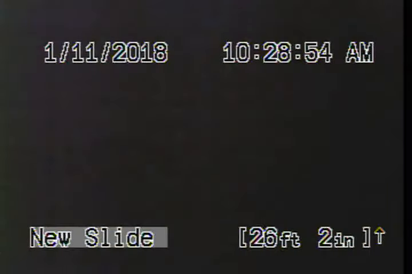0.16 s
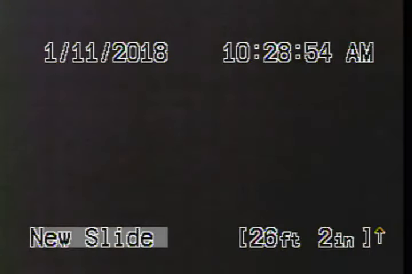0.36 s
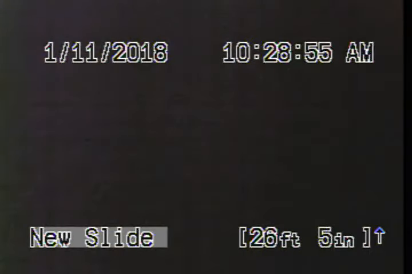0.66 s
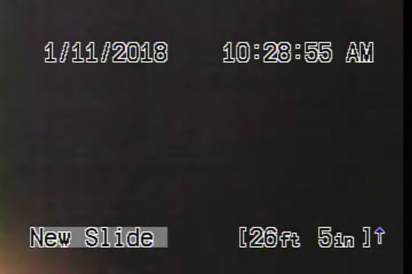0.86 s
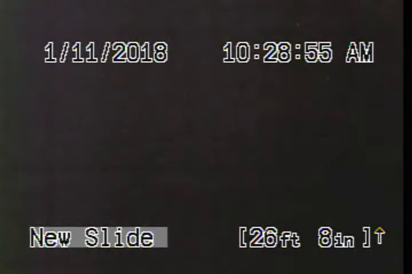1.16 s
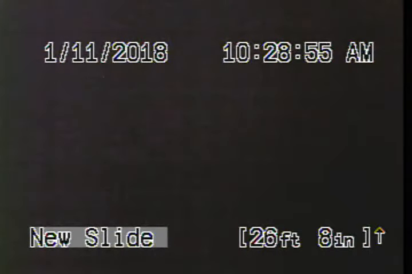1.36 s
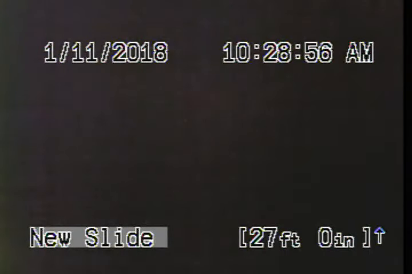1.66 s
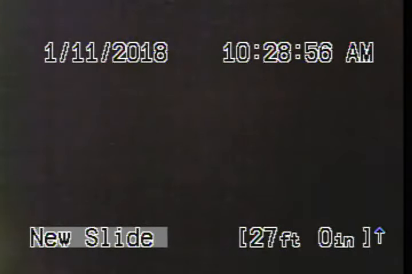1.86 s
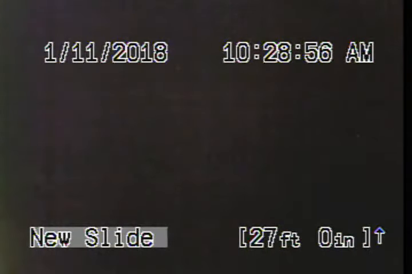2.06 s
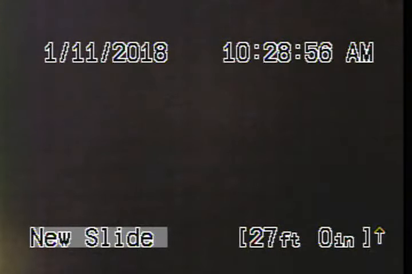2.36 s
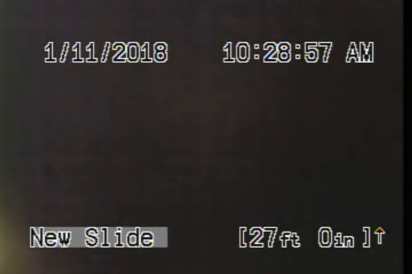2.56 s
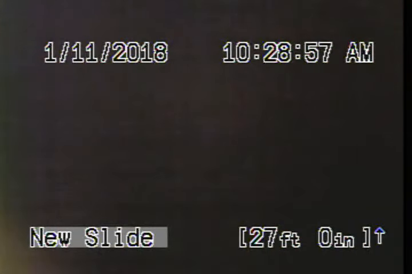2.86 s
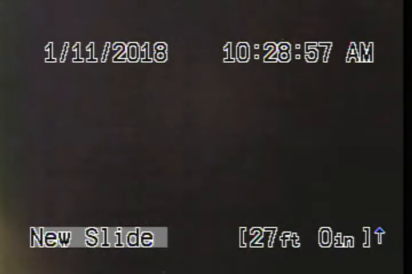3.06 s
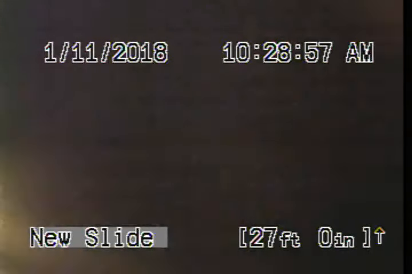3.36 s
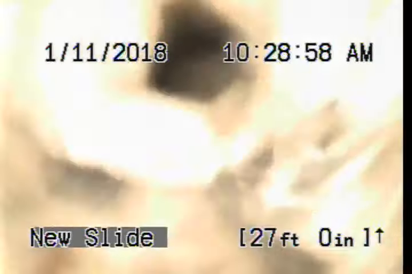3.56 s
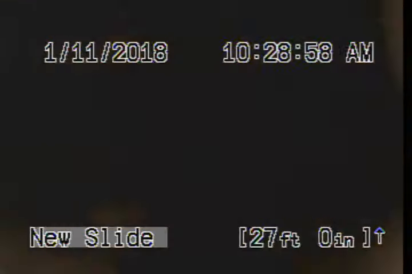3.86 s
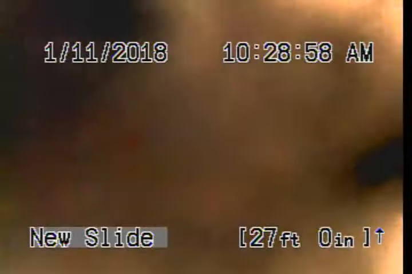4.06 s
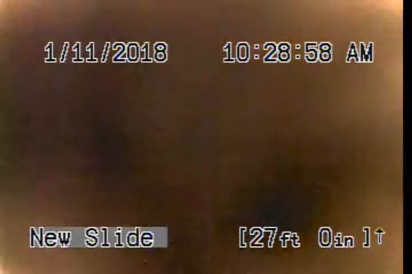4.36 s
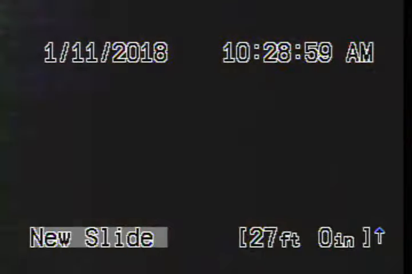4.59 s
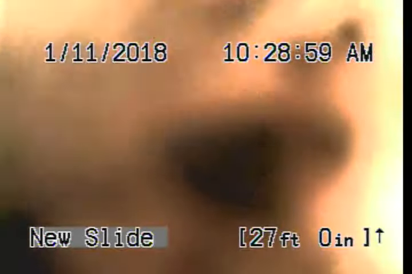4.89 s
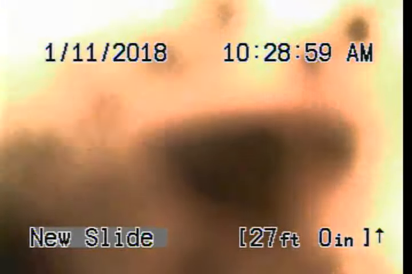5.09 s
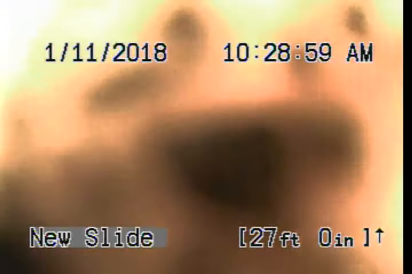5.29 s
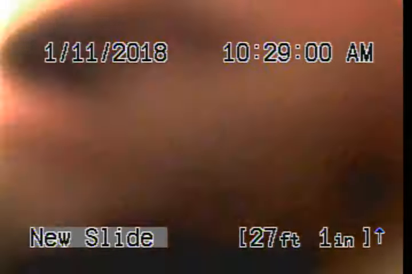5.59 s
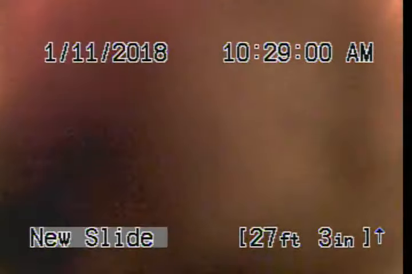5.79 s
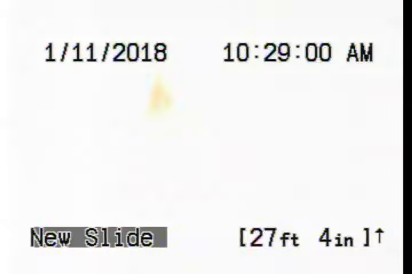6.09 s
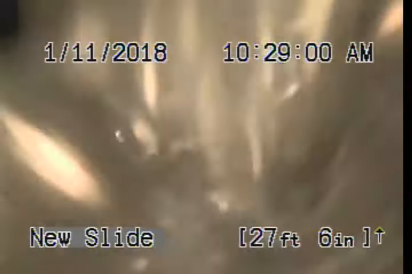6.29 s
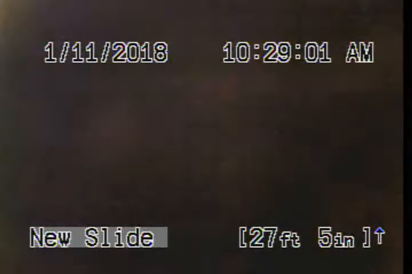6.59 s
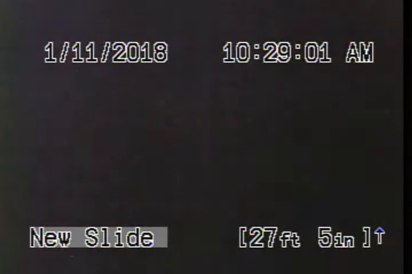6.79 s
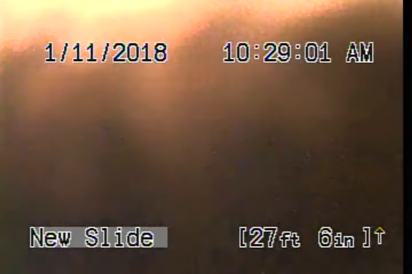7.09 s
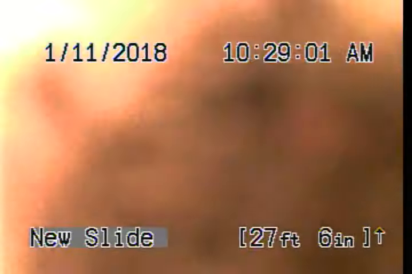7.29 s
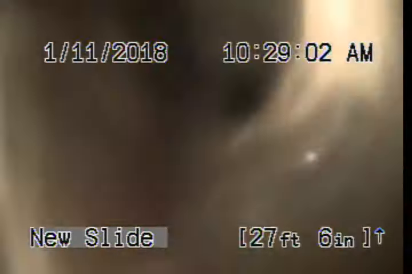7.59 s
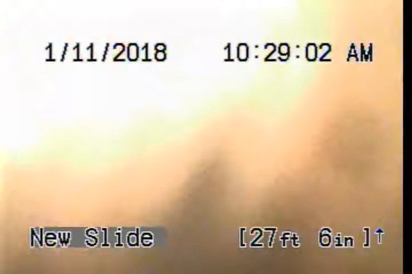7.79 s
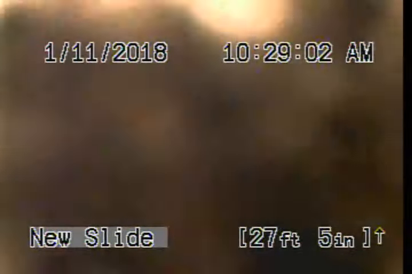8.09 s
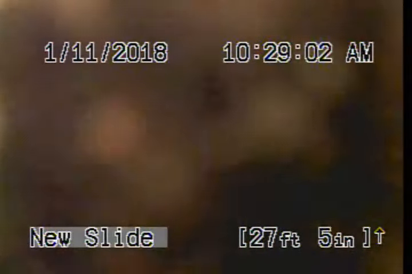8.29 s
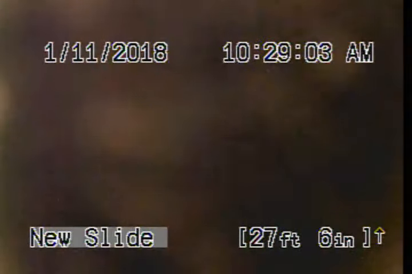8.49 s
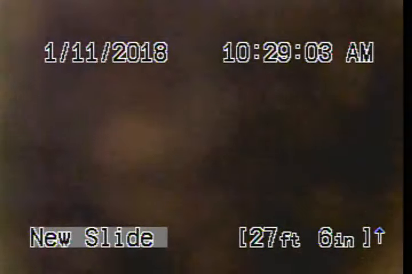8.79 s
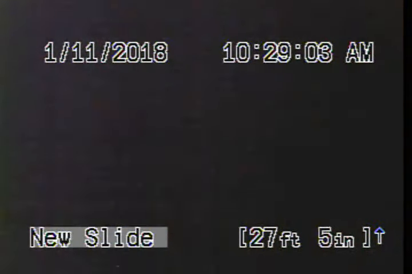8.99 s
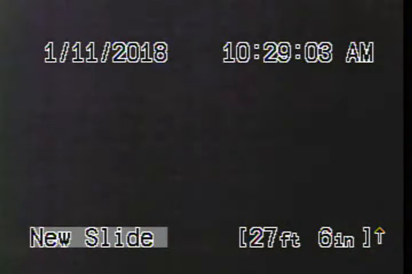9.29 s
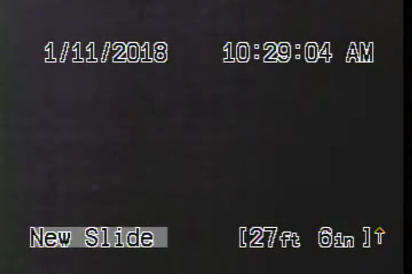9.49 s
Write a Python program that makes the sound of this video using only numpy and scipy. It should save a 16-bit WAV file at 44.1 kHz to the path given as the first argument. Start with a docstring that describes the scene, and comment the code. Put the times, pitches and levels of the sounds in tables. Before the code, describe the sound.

An inspection cable is pushed down a cast-iron drain in irregular strokes, each a rasp over the pipe mouth with a hollow rumble and rattle from the reel. It starts at once with bumps and scrapes, and a knock with a short high squeak near 0.8 seconds. The hardest shoves fall between 1.5 and 4 seconds, with loud hollow bumps; the reel sings a brief mid-pitched note around 1.6 and 2 seconds. From about 4 seconds the slides are lighter and quieter, broken by scattered knocks and faint squeaks. A steel part clinks near 4.4, 5.4 and 6.9 seconds. After a lull around 8 seconds, soft strokes resume, with squeaks, bumps and clinks around 9 seconds. The small microphone sounds narrow and boxy, with little treble, and distorts on the hard shoves.

```python
"""Pushing a camera cable down a drain

An inspection camera's cable is shoved in strokes down a cast-iron drain. Rubbing makes its reel rumble
and, on the hardest shoves, sing. The cable rasps over the pipe mouth, knocks and squeaks; reel and pipe
give hollow bumps, and now and then a jarred steel part clinks. The small microphone of the monitor
overloads on the hard shoves and passes only the pitch range of speech."""
import sys
import numpy as np
from scipy import signal
from scipy.fft import rfft, irfft, next_fast_len
from scipy.io import wavfile
from scipy.ndimage import uniform_filter1d

SR = 44100
rng = np.random.default_rng(int(sys.argv[2]) if len(sys.argv) > 2 else 0)


def to_wav(sig):
    """Store sig (one row per channel, or 1-D mono) as 16-bit WAV at the path in sys.argv[1].

    Samples outside -1..1 are clipped; the rate is SR.
    """
    pcm = np.clip(np.atleast_2d(sig), -1, 1) * 32767
    pcm = np.round(pcm).astype(np.int16)
    wavfile.write(sys.argv[1], SR, pcm.T)  # frames by channels


N = 425565
TIME = np.arange(N) / SR

# The tone of the cable rasping on the pipe. Each row: frequency in Hz, relative level in dB.
RASP_TONE = [(200, -40.5), (480, -9.5), (620, 4), (745, 4), (890, -7.5), (1030, -19), (1200, -15.5),
             (1400, -30.5), (1700, -27), (2400, -33.5), (5000, -50)]
# The notes (modes) at which the pipe mouth rings.
# Each row: pitch in Hz, relative level in dB, seconds to fade by 60 dB (called t60).
PIPE_MODES = [(1008, 6.5, 0.05), (1144, -14.5, 0.34), (2360, -11.5, 0.066)]


def from_db(db):
    """Turn decibels into a factor to multiply by."""
    return 10 ** (np.asarray(db) / 20)


def rms_one(x):
    """Scale a signal to an average power of 1."""
    return x / np.sqrt(np.mean(x ** 2) + 1e-20)


def drift(rate_hz):
    """A smooth random wander, about 1 in size."""
    slow = signal.sosfilt(signal.butter(2, rate_hz, fs=SR, output="sos"), rng.standard_normal(N + SR))
    return rms_one(slow[SR:])


def steady(x, span_s):
    """Hold the strength of a vibration near 1 over spans longer than span_s."""
    size = max(int(span_s * SR), 2)
    x = rms_one(x)
    return x / np.sqrt(uniform_filter1d(uniform_filter1d(x * x, size), size) + 1e-4)


def colour(x, points):
    """Shape the tone of a sound along a curve of (Hz, dB) points."""
    size = next_fast_len(N + SR)
    hz, db = np.transpose(points)
    bins_hz = np.maximum(np.arange(size // 2 + 1) * SR / size, 1)
    gain = from_db(np.interp(np.log(bins_hz), np.log(hz), db))
    cepstrum = irfft(np.log(gain), size)
    cepstrum[1:size // 2] *= 2    # folded forward so that the filter never sounds ahead of its input
    cepstrum[size // 2 + 1:] = 0
    return irfft(rfft(x, size) * np.exp(rfft(cepstrum)), size)[..., :N]


def ring(x, modes):
    """An object shaken by x rings at its own notes, each fading at its own speed."""
    out = np.zeros(N)
    for hz, db, t60 in modes:
        decay, angle = from_db(-60 / (t60 * SR)), 2 * np.pi * hz / SR
        feedback = [1, -2 * decay * np.cos(angle), decay * decay]
        out += from_db(db) * signal.lfilter([0, np.sin(angle)], feedback, x + 1e-18)
    return out


def clicks(times, level_db):
    """One click at each time."""
    out = np.zeros(N)
    out[np.clip(np.round(np.asarray(times) * SR).astype(int), 0, N - 1)] = from_db(level_db)
    return out


def push(start, length, attack_s, t60, swell_db=0, arch_db=3.5):
    """Strength of one push: it takes hold, arches and swells or eases, then dies away."""
    out, first = np.zeros(N), max(int(start * SR), 0)
    age = TIME[:min(SR, N - first)]
    from_middle = np.clip(age / length, 0, 1) - .5
    shape_db = swell_db * from_middle - arch_db * (2 * from_middle) ** 2
    fade_db = 60 * np.maximum(age - length, 0) / t60
    out[first:first + len(age)] = np.minimum(age / attack_s, 1) * from_db(shape_db - fade_db)
    return out


def feed_cable(waver_db=1.22, waver_hz=9):
    """Wavering strengths of rumble, rasp and hiss: each stroke lifts all three above a steady creep."""
    # Hard shoves come first, then lighter slides. Each row: start in seconds, length in seconds,
    # swell over the stroke in dB, then the levels of rumble, rasp and hiss in dB.
    strokes = [(0.0, .13, -2.5, -4.5, -17, -31.5), (0.144, 0.17, -24, -15.5, -30, -54),
               (0.316, 0.3, 4, -12.5, -28, -45), (0.601, 0.092, 1.5, -3.5, -11, -26),
               (0.704, 0.21, 7.5, -17.5, -28, -45), (0.961, 0.067, -13, -14, -22.5, -51),
               (1.227, 0.19, 5.5, -20, -27.5, -46), (1.512, 0.34, -9.5, -8, -13.5, -29.5),
               (1.795, 0.29, 4, 1.5, -8, -16.5), (2.18, 0.02, -15, 6.5, -3.5, -15.5),
               (2.325, 0.25, -23, -15.5, -22, -40), (2.573, 0.44, -6.5, -12.5, -22, -44),
               (2.917, 0.057, 0, 2.5, -5, -21.5), (3.049, 0.033, -11, -7.5, -12, -41),
               (3.111, 0.15, 14, -12.5, -21.5, -38), (3.232, 0.17, 9, 1.5, -6, -20.5),
               (3.494, 0.2, 20.5, -9, -15, -29), (3.762, 0.12, 20.5, -4.5, -11.5, -25.5),
               (4.113, 0.43, 1.5, -15.5, -21.5, -30), (4.54, 0.31, -13, -23.5, -33, -51),
               (4.896, 0.062, 5, -23.5, -40, -53), (5.024, 0.2, 12, -19, -28.5, -41),
               (5.21, 0.17, -1, -16.5, -25.5, -32), (5.429, 0.21, 3.5, -22.5, -30.5, -39.5),
               (5.647, 0.17, -3.5, -16.5, -26.5, -34.5), (5.852, 0.28, 1, -15.5, -28, -36.5),
               (6.148, 0.14, 2, -21, -30, -39.5), (6.364, 0.26, 12, -24, -33, -38),
               (6.551, 0.31, 3.5, -16, -22, -29.5), (7.23, 0.34, -4, -25.5, -36.5, -43),
               (7.56, 0.18, 20, -32, -44, -51), (8.447, 0.2, -0.5, -17.5, -29.5, -46),
               (8.697, 0.24, 20, -18, -22, -28.5), (8.944, .14, 0, -20.5, -28.5, -31.5),
               (9.136, 0.18, -21, -12, -22.5, -37.5), (9.376, 0.37, -1, -15.5, -27.5, -42)]
    # Between strokes the cable still creeps: the levels of rumble, rasp and hiss in dB.
    creep_db = (-30, -42, -57)
    powers = [from_db(db) ** 2 for db in creep_db]
    for start, length, swell_db, rumble_db, rasp_db, hiss_db in strokes:
        attack_s = 0.011 * 2 ** (-rumble_db / 14.5)    # a light stroke takes hold more gently
        reel = push(start, length, attack_s, t60=0.28, swell_db=swell_db)
        slide = push(start, length, attack_s, t60=0.13, swell_db=swell_db)
        strengths = from_db(rumble_db) * reel, from_db(rasp_db) * reel, from_db(hiss_db) * slide
        powers = [power + strength ** 2 for power, strength in zip(powers, strengths)]
    return [np.sqrt(power) * from_db(waver_db * drift(waver_hz)) for power in powers]


def slips(per_s, spread_db, smooth):
    """A surface sticks and slips: tiny catches of uneven size over smooth rubbing."""
    sizes = from_db(spread_db * np.minimum(rng.exponential(1, N), 4)) * rng.choice([-1, 1], N)
    return rms_one(sizes * (rng.random(N) < per_s / SR)) + smooth * rng.standard_normal(N)


def snags(per_s, relax_s):
    """The cable snags and slips free: its tension jumps at random moments and relaxes."""
    jumps = (rng.random(N) < per_s / SR) * rng.uniform(0.49, 1, N)
    tension = signal.lfilter([1], [1, -np.exp(-1 / (relax_s * SR))], jumps)
    return rms_one(tension - tension.mean())


def cable_echoes(x, trip_s=.003, stretch=0.143, echo=0.6):
    """Waves return along the free length of cable; as that length changes, its ringing glides."""
    lag = trip_s * SR * np.exp(stretch * drift(rate_hz=3.47))
    now = np.arange(N)
    return x + echo * np.interp(now - lag, now, x) + echo ** 2 * np.interp(now - 2 * lag, now, x)


def sliding_cable():
    """Rubbing and knocks shake the reel (low), the pipe mouth (middle) and the cable's skin (high)."""
    # The tones of the reel's rumble and the skin's hiss. Each row: frequency in Hz, relative level in dB.
    rumble_tone = [(20, -28.5), (70, -27), (100, -10.5), (135, -11), (185, 1.5), (250, -1), (320, 5),
                   (420, -4), (540, -8.5), (680, -14.5), (1000, -39), (2000, -56.5)]
    hiss_tone = [(600, -39.5), (1500, -29.5), (1820, 1.5), (2150, 0.5), (2400, 4.5), (2600, 0), (2950, 4),
                 (3250, 0.5), (3600, -7.5), (4100, -22), (6000, -35.5)]
    # The reel's own notes. Each row: pitch in Hz, relative level in dB, fade time in seconds.
    reel_modes = [(184.4, -12, 0.43), (208.1, 2, 0.24), (248, 4, 0.13), (300, 0, 0.36), (325.3, -14, 0.44),
                  (352.8, -8.5, 0.21), (422, 4.5, 0.23), (474, -2, 0.073), (603, -7, 0.16)]
    rumble, rasp, hiss = feed_cable()
    times, thud_db, clack_db, edge_db = knocks()
    catches = slips(per_s=260, spread_db=2.5, smooth=0.75)
    fine_catches = slips(per_s=1600, spread_db=3.5, smooth=0.76)
    load = rumble / (rumble + from_db(-35.5))    # the cable snags only under load
    judder = load * snags(per_s=32, relax_s=.013)
    thud = from_db(0.17) * chatter(times, thud_db, t60=0.2, hold_s=0.0078)
    clack = from_db(1.6) * chatter(times, clack_db, t60=0.11, hold_s=0.0068)
    edge = from_db(9.0) * chatter(times, edge_db, t60=0.038, hold_s=0.004)
    # How strong each range is over time; hypot adds two strengths by their power.
    low = np.hypot(rumble * from_db(-3.0 + 1.9 * judder), thud)
    low = np.hypot(low, tightening(times, thud_db))
    middle = np.hypot(rasp * from_db(1.6 * judder), clack)
    middle = np.hypot(middle, tightening(times, clack_db))
    high = np.hypot(hiss * from_db(0.2 + 1.7 * judder), edge)
    hollow = from_db(-7.5) * rms_one(ring(catches, reel_modes))
    reel = low * steady(rms_one(colour(catches, rumble_tone)) + hollow, span_s=0.019)
    pipe = middle * steady(colour(cable_echoes(catches), RASP_TONE), span_s=0.016)
    skin = high * steady(colour(cable_echoes(fine_catches + catches), hiss_tone), span_s=0.0037)
    mouth_ring = from_db(-1) * np.minimum(high, middle) * rms_one(ring(fine_catches, PIPE_MODES))
    return reel + pipe + skin + mouth_ring + loose_coils(rumble)


def loose_coils(rumble, per_s=18, low_hz=170, high_hz=560, count=12, ring_cycles=16):
    """Loose coils bump the reel at random, as hard as it rumbles, each with a brief hollow note."""
    hits = rumble * (rng.random(N) < per_s / SR) * from_db(-1 + rng.normal(0, 2.5, N))
    which_coil = rng.integers(0, count, N)
    notes = sum(ring(hits * (which_coil == coil), [(hz, 0, ring_cycles / hz)])
                for coil, hz in enumerate(np.geomspace(low_hz, high_hz, count)))
    return signal.sosfilt(signal.butter(2, [low_hz, high_hz], "band", fs=SR, output="sos"), notes)


def chatter(times, level_db, t60, hold_s, onset_s=0.002):
    """Strength of the rattling after each hit: it lasts a moment, then dies away."""
    power = np.zeros(N)
    for start, db in zip(times, level_db):
        first = int(start * SR)
        age = TIME[:min(SR // 2, N - first)]
        onset = np.minimum(age / onset_s, 1)
        fade_db = 60 * np.maximum(age - hold_s, 0) / t60
        power[first:first + len(age)] += (onset * from_db(db - fade_db)) ** 2
    return np.sqrt(power)


def steel_clinks(build_s=0.0067):
    """A jarred steel part chatters and builds up a ring that drops quickly and leaves a thin tail."""
    # The moments when the steel is jarred. Each row: start in seconds, relative level in dB.
    clinks = [(0.02, -25.5), (3.753, -33), (4.437, -16), (4.638, -34.5), (4.715, -32), (4.774, -32.5),
              (5.383, -18), (5.755, -31.5), (5.89, -30.5), (6.068, -52), (6.353, -29.5), (6.929, -24.5),
              (7.046, -35.5), (8.196, -46), (8.908, -23), (9.155, -21)]
    # The steel's own notes. Each row: pitch in Hz, relative level in dB, fade time in seconds.
    steel_modes = [(2570, -25, .3), (2960, 4, 0.12), (2884, 4, 0.23), (2816, 4, 0.23), (3150, -9.5, 0.3),
                   (3290, -18.5, 0.25)]
    times, db = np.transpose(clinks)
    tail = from_db(-14) * chatter(times, db, t60=.33, hold_s=.02)
    strength = chatter(times, db, t60=0.057, hold_s=0.021) + tail
    size = int(build_s * SR)
    swell = signal.fftconvolve(strength, np.ones(size) / size)[:N]
    shaken_ring = steady(ring(rng.standard_normal(N), steel_modes), span_s=0.022)
    free_ring = ring(clicks(times + build_s, db), steel_modes)
    return from_db(2.0) * swell * shaken_ring + from_db(-12) * free_ring


def tightening(times, level_db, lead_s=.022):
    """Strength of the brief scrape that grows as the cable tightens before each knock."""
    out = np.zeros(N)
    for knock_s, db in zip(times, level_db):
        part = slice(max(int((knock_s - lead_s) * SR), 0), int(knock_s * SR))
        out[part] += from_db(db - 18.5) * np.linspace(0, 1, len(out[part]))
    return out


def knocks():
    """The cable knocks on reel and pipe: times, and levels of low thud, middle clack and sharp edge."""
    # Each row: start in seconds, then the relative levels of the thud and the edge in dB.
    hits = [(0.077, -6.5, -50), (0.349, -15.5, -64), (0.513, -19.5, -53), (0.613, -7, -53),
            (0.722, -14.5, -41), (0.804, -3, -23.5), (0.958, -11, -49.5), (1.017, -10.5, -54),
            (1.332, -4.5, -35.5), (1.519, 0.5, -18.5), (1.603, -8.5, -24), (1.792, -3, -25),
            (2.172, -1.5, -45.5), (2.231, -7.5, -29), (2.323, -17.5, -36.5), (2.34, -16.5, -53),
            (2.444, -13, -33.5), (2.604, -7, -40), (2.931, -30, -40), (3.068, -6, -39), (3.21, -17, -53),
            (3.62, -2.5, -30), (4.212, -1.5, -26.5), (4.433, -6.5, -25), (4.637, -17.5, -35),
            (4.696, -13, -41), (4.714, -15, -31.5), (4.773, -16.5, -36.5), (5.192, -14.5, -41.5),
            (5.383, -11.5, -21.5), (5.893, -17.5, -39), (6.067, -21.5, -24.5), (6.333, -18, -37),
            (6.353, -12.5, -29.5), (6.924, -8.5, -32.5), (7.042, -16.5, -38.5), (7.285, -24.5, -61.5),
            (7.457, -20.5, -66.5), (8.195, -15.5, -31), (8.302, -28.5, -51), (8.482, -27, -38.5),
            (8.788, -18, -29), (9.123, -14, -48.5), (9.147, -18, -46.5)]
    times, thud_db, edge_db = np.transpose(hits)
    clack_db = thud_db + 2.5 + .35 * (edge_db - thud_db)
    return times, thud_db, clack_db, edge_db


def knock_blows():
    """Each knock opens with one hard blow, which leaves the pipe mouth ringing."""
    times, _, clack_db, edge_db = knocks()
    blow = from_db(17) * colour(clicks(times, clack_db), RASP_TONE)
    return blow + from_db(7) * ring(clicks(times, edge_db), PIPE_MODES)


def hollow_bumps(contact_s=0.0039, ring_cycles=29, overtone_ratio=2.5):
    """A soft blow on reel or pipe rings a low note and a shorter, higher one."""
    # Each row: start in seconds, pitch in Hz, level in dB.
    bumps = [(.077, 242.6, 5.5), (.175, 283, -1), (0.292, 285, -4), (.895, 279, -7), (1.519, 204, 6.5),
             (1.793, 203.3, 8), (2.17, 200, -3), (2.545, 465, -5.5), (3.39, 218, 6.5), (3.889, 205.8, 7.5),
             (4.219, 215, -5.5), (4.449, 137, -5), (5.189, 95, -15), (5.386, 109, -12), (5.407, 250, -4),
             (6.073, 213, -2.5), (6.112, 431, -3.5), (6.925, 674, 3), (7.224, 180, -10.5),
             (7.579, 422, -4.5), (8.206, 307, -6.5), (8.915, 503, -4.5), (8.956, 200, -6.5),
             (9.162, 546, -5), (9.191, 187, -2.5)]
    out = np.zeros(N)
    for start, hz, db in bumps:
        t60 = ring_cycles / hz * 2 ** (db / 14)    # a bump 14 dB stronger rings twice as long
        first = int(start * SR)
        age = TIME[:min(SR // 2, N - first)]
        fade = from_db(-60 * age / t60)
        phase = 2 * np.pi * hz * age
        tone = fade * np.sin(phase) + from_db(-10) * fade ** 2 * np.sin(overtone_ratio * phase)
        out[first:first + len(age)] += from_db(db) * (1 - np.exp(-age / contact_s)) * tone
    return out


def squeaks():
    """At a tight spot the rubbing locks loosely onto a gliding pitch; the looser, the rougher."""
    # Each row: start and end in seconds, first and last pitch in Hz, pitch spread in Hz, level in dB.
    tight_spots = [(.8, 0.845, 3206, 2850, 900, -17.5), (2.33, 2.432, 3620, 3760, 715, -34),
                   (4.13, 4.265, 1680, 1490, 179, -33), (4.628, 4.653, 1005, 1015, 50, -19),
                   (5.47, 5.645, 1130, 1060, 91, -33), (6.38, 6.548, 2990, 2570, 248, -35.5),
                   (6.68, 6.842, 3250, 2940, 301, -32), (8.77, 8.864, 1076, 1006, 110, -21.5),
                   (8.922, 9.025, 1076, 1033, 110, -27), (9.22, 9.297, 3250, 3480, 400, -36.5)]
    out = np.zeros(N)
    for start, end, from_hz, to_hz, width_hz, db in tight_spots:
        part = slice(int(start * SR), int(end * SR))
        progress = np.linspace(0, 1, len(out[part]))
        phase = 2 * np.pi * np.cumsum(from_hz + progress * (to_hz - from_hz)) / SR
        wobble = drift(width_hz / 2)[part] + 1j * drift(width_hz / 2)[part]
        rough_tone = rms_one(np.real(wobble * np.exp(1j * phase)))
        out[part] += from_db(db) * np.sin(np.pi * progress) * rough_tone
    return out


def reel_song(wander_hz=12):
    """Under hard rubbing the reel locks onto its main note and sings, over a looser ringing."""
    # The moments when it sings. Each row: start in seconds, length in seconds, level in dB.
    songs = [(1.618, 0.086, -7.5), (1.963, 0.14, -3), (3.26, 0.036, -1.5), (3.661, 0.018, -2.5),
             (3.85, 0.023, -29)]
    # Its singing notes, main one first. Each row: pitch in Hz, relative level in dB, fade time in seconds.
    song_modes = [(744.9, -11.5, 0.11), (769, -10.5, 0.031)]
    strength = sum(from_db(db) * push(start, length, attack_s=0.029, t60=0.15)
                   for start, length, db in songs)
    pitch_hz = song_modes[0][0] + wander_hz * drift(rate_hz=25)
    locked = np.sin(2 * np.pi * np.cumsum(pitch_hz) / SR)
    loose = steady(ring(rng.standard_normal(N), song_modes), span_s=0.019)
    return strength * (locked + from_db(-4) * loose)


def scene():
    """All the sounds of cable, reel and pipe, added into one channel."""
    return (sliding_cable() + knock_blows() + reel_song() + hollow_bumps() + squeaks()
            + steel_clinks())[None]


def overload(x, top, bottom, hardness=6):
    """An amplifier runs out of swing and squashes peaks, with separate limits upward and downward."""
    limit = np.where(x > 0, top, bottom)
    return x / (1 + np.abs(x / limit) ** hardness) ** (1 / hardness)


def record(dry, notch_hz=1971, speech_edge_hz=4124, treble_edge_hz=15850):
    """The monitor's microphone overloads unevenly and passes the speech range, with one dip in it."""
    x = overload(dry, top=0.772, bottom=0.52)
    x = signal.lfilter(*signal.iirnotch(notch_hz, Q=1.9, fs=SR), x)
    x = signal.sosfilt(signal.ellip(8, .5, 70, speech_edge_hz, fs=SR, output="sos"), x)
    # A capacitor blocks the slow offset left by the uneven overload.
    x = signal.sosfilt(signal.butter(1, 3.0, "high", fs=SR, output="sos"), x)
    x = np.clip(x, -.74, .715)    # a firm ceiling
    # The treble is gently reshaped. Each pair: frequency in Hz, gain in dB.
    x = colour(x, [(3800, 0), (4200, -0.5), (4900, -4.5), (6000, -3.5), (8000, 2.5), (15000, -3.5)])
    return signal.sosfilt(signal.ellip(10, .1, 80, treble_edge_hz, fs=SR, output="sos"), x)


dry = scene()
out = record(dry)
to_wav(out)
```